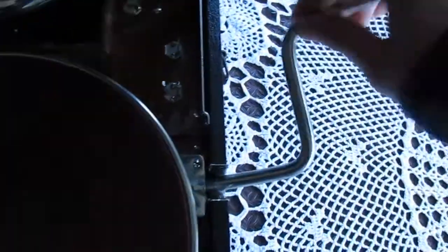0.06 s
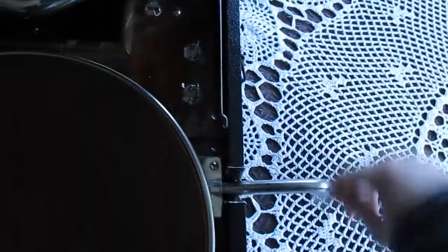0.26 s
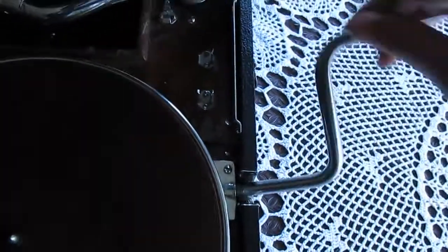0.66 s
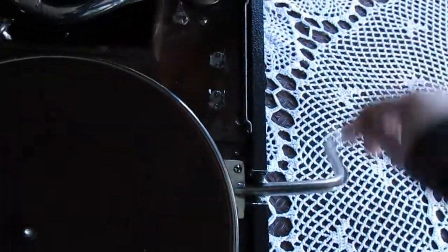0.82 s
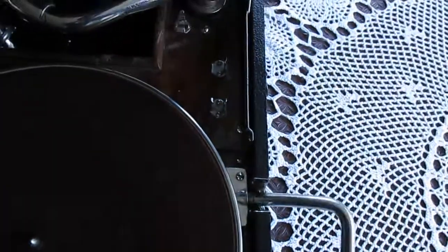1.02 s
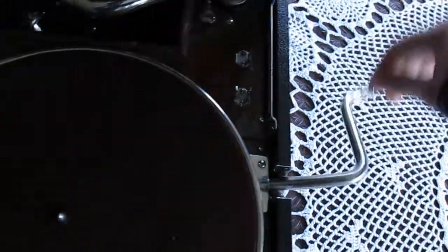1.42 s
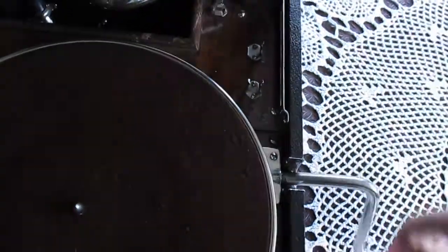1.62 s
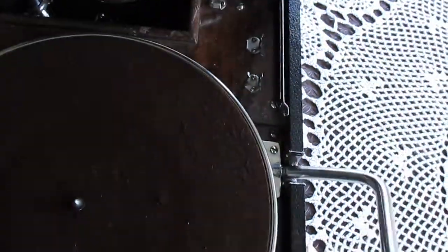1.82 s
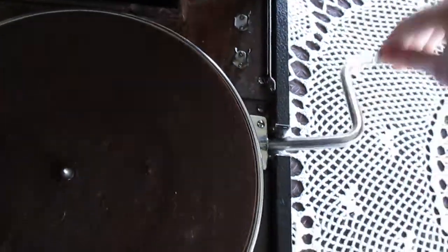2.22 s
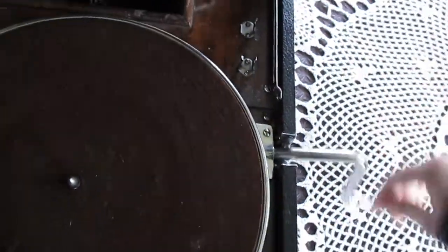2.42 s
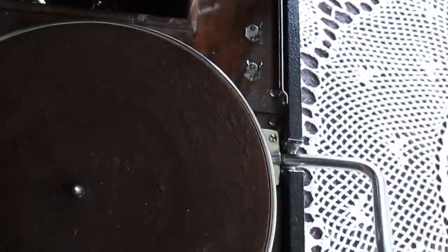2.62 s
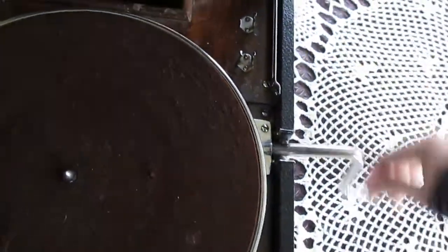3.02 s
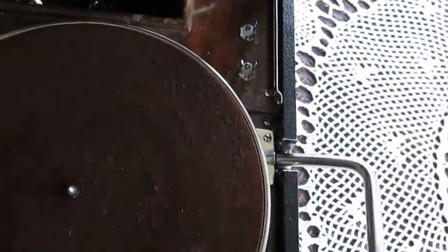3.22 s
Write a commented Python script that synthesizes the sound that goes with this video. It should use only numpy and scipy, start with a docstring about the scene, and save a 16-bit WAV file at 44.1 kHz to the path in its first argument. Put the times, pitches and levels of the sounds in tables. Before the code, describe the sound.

A portable gramophone being cranked by hand, with uneven mechanical clicks and clunks.

```python
"""A small room, close to a portable gramophone being wound by hand.
Loose crank, gears and pawl knock unevenly into the wooden case; hard catches make the steel ping
and the case boom. The mainspring rumbles as it tightens and its coils slip.
Grip and shaft rub softly as they turn, over a faint steady background."""
import sys
import numpy as np
from scipy import signal
from scipy.fft import rfft, irfft
from scipy.io import wavfile

SR = 44100
rng = np.random.default_rng(int(sys.argv[2]) if len(sys.argv) > 2 else 0)


def put_to_file(sound):
    """Save the sound as 16-bit audio at rate SR, in the file named by the first command-line argument."""
    columns = np.atleast_2d(sound).T  # one column per channel
    safe = np.clip(columns, -1, 1)
    whole_steps = np.round(safe * 32767)
    wavfile.write(sys.argv[1], SR, whole_steps.astype(np.int16))


N = 147735
RIGHT = np.arange(2)[:, None]  # 0 left, 1 right
TAIL_S = np.arange(SR // 2) / SR  # time since a blow


def noise(n):
    """White noise, independent left and right."""
    return rng.standard_normal((2, n))


def clicks(n, per_s):
    """Stereo clicks of random time and size."""
    sizes = noise(n)
    return sizes * (rng.random(sizes.shape) < per_s / SR)


def amp(db):
    """dB to gain."""
    return 10 ** (np.asarray(db) / 20)


def unit(x):
    """Scale to rms 1."""
    return x / np.std(x)


def add(mix, start_s, sound):
    """Mix in a stereo sound."""
    part = mix.T[round(start_s * SR):][:len(sound.T)]
    part += sound.T[:len(part)]


def shaped(x, gain):
    """Filter by gain(f/Hz)."""
    n = len(x.T)
    return irfft(rfft(x) * gain(np.fft.rfftfreq(n) * SR + 1), n)


def spectrum_gain(points, hz):
    """Gain of a (f/Hz, level/dB) curve, interpolated in log f."""
    f, db = np.transpose(points)
    return amp(np.interp(np.log(hz), np.log(f), db))


def low_pass(hz, edge_hz, order=6):
    """Low-pass gain; high-pass with the frequencies swapped."""
    return 1 / np.hypot(1, (hz / edge_hz) ** order)


def pair(x, correlation):
    """Correlate two independent channels."""
    left, other = x
    return np.array([left, correlation * left + np.sqrt(1 - correlation ** 2) * other])


def fade(t, t60_s):
    """Exponential decay."""
    return np.exp(-np.log(1000) * t / t60_s)


def background():
    """Steady low rumble and faint hiss."""
    # noise spectrum: f/Hz, relative level/dB
    spectrum = [(15, -40), (25, 3.5), (242, -14), (1700, -14.5), (1940, -12), (4140, -25.5), (10700, -24.5),
                (16000, -40.5)]
    return amp(-49.5) * unit(shaped(pair(noise(N), 0.053), lambda f: spectrum_gain(spectrum, f)))


def room(x):
    """Sparse reflections after 5 ms, dull at the top; bass outlasts treble."""
    bass_t60_s, treble_t60_s = 0.22, 0.17
    taps = pair(clicks(len(TAIL_S), per_s=3500) * (TAIL_S > 0.005), 0.84)
    bass = shaped(taps, lambda f: low_pass(f, 940, order=2))
    treble = shaped(taps - bass, lambda f: low_pass(f, 4560, order=3))
    tail = bass * fade(TAIL_S, bass_t60_s) + treble * fade(TAIL_S, treble_t60_s)
    tail /= np.linalg.norm(taps[0] * fade(TAIL_S, bass_t60_s))
    return signal.fftconvolve(x, tail, axes=1)[:, :N]


def rubbing():
    """Grip and shaft turn: swells of friction noise, each around one resonance."""
    # rubs: t/s, length/s, peak level/dB, centre f/Hz, half-width/centre
    rubs = [(0.051, 0.16, -44.5, 2020, 0.12), (1.503, 0.4, -55.5, 8240, 0.098),
            (1.95, 1.6, -55, 2020, 0.05), (3.008, 0.047, -37, 9450, 0.44)]
    out = np.zeros((2, N))
    for start_s, length_s, db, hz, width in rubs:
        n = int(length_s * SR)
        hiss = shaped(noise(N)[:, :n], lambda f: 1 / (1 + (np.log(f / hz) / width) ** 2))
        add(out, start_s, amp(db) * unit(hiss) * np.hanning(n))
    return out


def mainspring():
    """Coils slip on each other in many small, dull jolts."""
    # rumble envelope: t/s, level/dB
    envelope = [(0, -52.5), (.23, -38), (.44, -45), (.95, -39), (1.08, -50), (1.4, -36.5), (1.62, -48),
                (2.18, -41), (2.28, -47), (2.73, -46.5), (2.83, -35.5), (3.03, -34), (3.2, -47.5)]
    # rumble spectrum: f/Hz, relative level/dB
    spectrum = [(55, -14.5), (120, 2.5), (180, -1), (250, 1.5), (550, -11), (8000, -40)]
    slips = pair(clicks(N, per_s=1500), 0.91)
    rumble = unit(shaped(slips, lambda f: spectrum_gain(spectrum, f)))
    return rumble * amp(np.interp(np.arange(N) / SR, *np.transpose(envelope)))


def hard_catches():
    """One struck part rings out: steel high and short, the hollow case low and slow to swell."""
    # ringing parts: t/s, f/Hz, level/dB
    rings = [(0.218, 228, -21), (0.335, 1350, -17), (.644, 12040, -14.5), (.644, 9770, -12.5),
             (.648, 497.4, -15.5), (.648, 355, -15.5), (0.811, 1298, -15.5), (0.834, 244, -24),
             (.908, 1330, -16.5), (1.147, 465, -14), (1.165, 240, -22.5), (1.312, 9800, -19.5),
             (1.325, 338, -19), (1.367, 241, -21), (1.483, 241, -17), (1.991, 2160, -13),
             (1.990, 12300, -17), (2.335, 248, -19), (2.778, 410, -10), (2.791, 246, -20),
             (2.826, 345, -21), (3.014, 241, -26.5)]
    t60_at_1khz_s, rise_cycles = 0.046, 1.4
    out = np.zeros((2, N))
    for start_s, hz, db in rings:
        t60_s = t60_at_1khz_s * (hz / 1000) ** -0.55
        envelope = np.tanh(TAIL_S * hz / rise_cycles) * fade(TAIL_S, t60_s)
        phase = 2 * np.pi * rng.random() + RIGHT * np.tanh(hz / 2000)  # lows nearly in phase
        add(out, start_s, amp(db) * envelope * np.sin(2 * np.pi * hz * TAIL_S + phase))
    return out


def mode(t, hz, db, t60_s, correlation):
    """One damped mode; pitch, level and phase vary per blow."""
    detune, spread_db = 0.014, 1
    tune, size, side = rng.standard_normal(3)
    phase = 2 * np.pi * rng.random() + RIGHT * np.sign(side) * np.arccos(correlation)
    tone = np.sin(2 * np.pi * hz * (1 + detune * tune) * t + phase)
    return amp(db + spread_db * size) * fade(np.maximum(t, 0), t60_s) * tone


def dense_ring(n, low_hz, high_hz, top_hz, correlation):
    """Crowded overtones as band noise; each impact point favours different ones."""
    # overtone spectrum: f/Hz, relative level/dB
    colour = [(500, 7), (590, -1), (700, 3.5), (2200, 0), (4200, -10.5), (5800, -7.5), (7900, -18.5),
              (14000, -21.5)]
    source = pair(noise(n), correlation)
    knots_hz = np.geomspace(200, 16000, 70)
    ripple_db = 4 * rng.standard_normal(len(knots_hz))

    def gain(f):
        band = low_pass(low_hz, f) * low_pass(f, high_hz) * low_pass(f, top_hz, order=2)
        return band * spectrum_gain(colour, f) * amp(np.interp(f, knots_hz, ripple_db))

    return unit(shaped(source, gain))


def knocks():
    """Crank, gears and pawl strike case and motor: clear modes over a dense, short ring."""
    # blows: t/s, wood level/dB, clank level/dB, tick level/dB
    blows = [(0.04, -42.5, -41, -54.5), (0.195, -30.5, -35.5, -43), (0.302, -30.5, -31, -42.5),
             (0.317, -33.5, -35, -48), (0.335, -34, -26, -36.5), (0.348, -46, -33.5, -41),
             (0.524, -27.5, -27, -35.5), (0.566, -31, -23.5, -25), (0.571, -30, -20.5, -22),
             (0.578, -29.5, -21, -34), (0.619, -40, -42, -49), (0.644, -32, -23, -17),
             (0.656, -27, -23, -28), (0.702, -37, -32, -35), (0.811, -28.5, -25, -27),
             (0.908, -26, -21, -29.5), (0.952, -34.5, -32, -51), (0.968, -41.5, -33.5, -47),
             (1.146, -23, -22, -19), (1.215, -31, -28.5, -45.5), (1.292, -23.5, -18, -24),
             (1.313, -25.5, -19.5, -22), (1.331, -32.5, -30, -27), (1.346, -32, -27.5, -29),
             (1.355, -36.5, -32, -33), (1.465, -32, -38, -45.5), (1.659, -38, -35.5, -49.5),
             (1.843, -36, -32, -88), (1.89, -27, -32.5, -31.5), (1.991, -31.5, -24, -26),
             (2.009, -32.5, -22.5, -22.5), (2.035, -30.5, -25, -36.5), (2.055, -29.5, -25, -30),
             (2.172, -40.5, -52, -75), (2.301, -40.5, -42, -64), (2.318, -28.5, -26, -37.5),
             (2.326, -23.5, -21.5, -35.5), (2.454, -34, -48, -53.5), (2.492, -37, -38.5, -52),
             (2.649, -40, -56, -46.5), (2.777, -25, -20, -20), (2.824, -28.5, -25, -28),
             (2.871, -33.5, -31, -39), (2.998, -40.5, -35.5, -54), (3.065, -32, -24.5, -31)]
    # thud, wood, clank and tick bands: low f/Hz, high f/Hz
    bands = [(85, 300), (300, 1480), (1800, 3900), (3900, 15000)]
    # ring of each band: rise/s, t60/s, left-right correlation
    responses = [(0.016, 0.15, 0.97), (0.0036, 0.088, 0.95), (0.00099, 0.034, 0.11), (0.00022, 0.023, 0.21)]
    # case and motor modes: f/Hz, level/dB re dense ring, t60/s
    modes = [(123.6, -5, 0.24), (238.7, -4, 0.17), (352.5, -8.5, 0.17), (500.7, -3.5, 0.087),
             (660.7, -12, 0.14), (1069, -25, 0.28), (1983, 2, 0.018)]
    thud_re_wood_db, lead_in_db, lead_in_rise_s = -10, -14, 0.0014
    out = np.zeros((2, N))
    t = np.arange(-400, 16000) / SR  # impact at 0
    age_s = np.maximum(t, 0)
    # each knock swells briefly just before its peak
    lead_in = amp(lead_in_db) * np.exp(np.minimum(t, 0) / lead_in_rise_s)
    for impact_s, wood_db, clank_db, tick_db in blows:
        top_hz = 19300 * 2 ** (0.04 * tick_db)  # softer blows are duller
        levels_db = (wood_db + thud_re_wood_db, wood_db, clank_db, tick_db)
        for db, (low_hz, high_hz), (rise_s, t60_s, correlation) in zip(levels_db, bands, responses):
            ring = dense_ring(len(t), low_hz, high_hz, top_hz, correlation) * fade(age_s, t60_s)
            ring += sum(mode(t, *row, correlation) for row in modes if low_hz <= row[0] < high_hz)
            attack = 1 - np.exp(-(age_s / rise_s) ** 2)
            ring *= np.maximum(attack, lead_in)
            early_rms = np.std(ring[:, (t > 0) & (t < t60_s / 4)])
            add(out, impact_s + t[0], amp(db) * ring / early_rms)
    return out


def scene():
    """Gramophone, treble leaning left, plus background and room."""
    treble_left_re_right_db, room_db = 4, -10
    winding = knocks() + hard_catches() + mainspring() + rubbing()
    tilt_db = (0.5 - RIGHT) * treble_left_re_right_db
    winding = shaped(winding, lambda f: amp(tilt_db * low_pass(1000, f, order=3)))
    return winding + background() + amp(room_db) * room(winding)


def record(dry):
    """Steep band limit."""
    edge_hz = 15950
    taps = signal.firwin(511, edge_hz, window=("kaiser", 9), fs=SR)
    return signal.oaconvolve(dry, taps[None], "same")


dry = scene()
out = record(dry)
put_to_file(out)
```